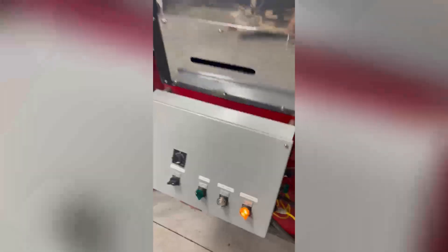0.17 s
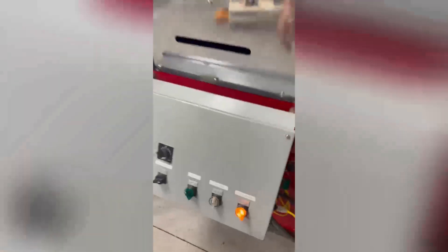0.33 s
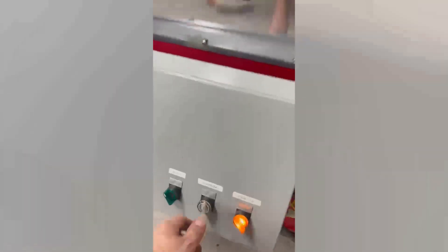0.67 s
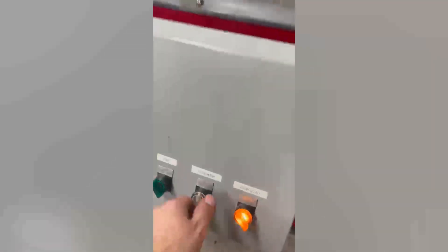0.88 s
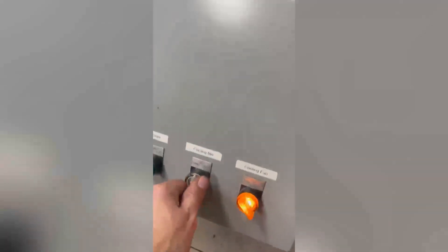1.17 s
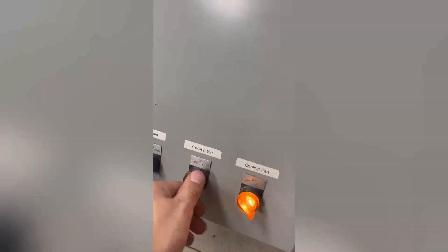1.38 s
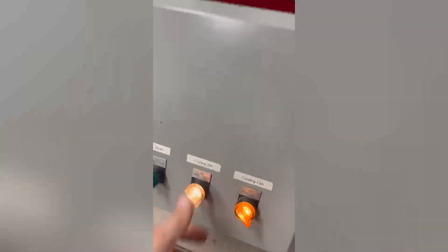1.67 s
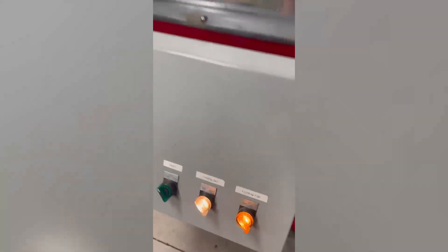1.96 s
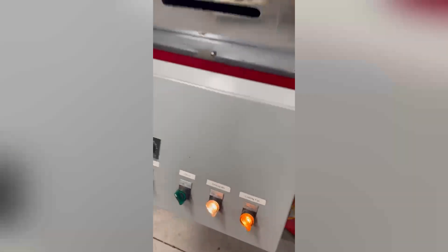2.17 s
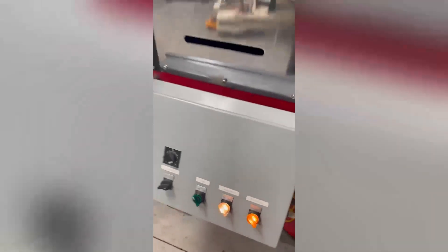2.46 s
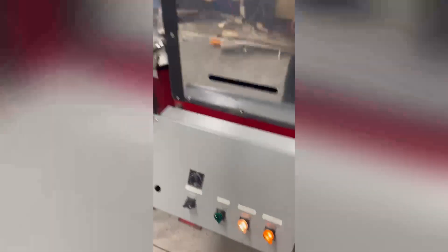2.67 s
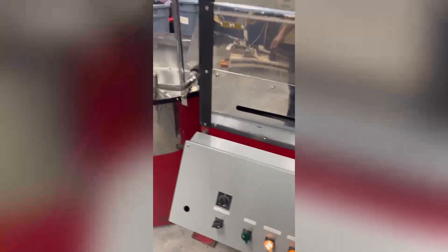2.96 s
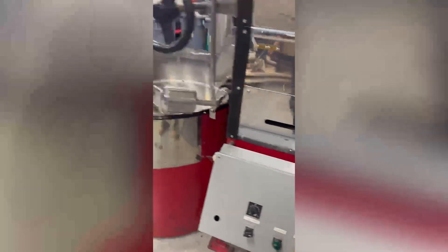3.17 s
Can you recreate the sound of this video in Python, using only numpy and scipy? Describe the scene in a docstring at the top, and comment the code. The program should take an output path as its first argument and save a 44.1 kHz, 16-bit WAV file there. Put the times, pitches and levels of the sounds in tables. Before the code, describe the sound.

A large machine's fan roars in a workshop, its tone slowly climbing over humming motors and thin high whines. Near the middle, a switch clicks sharply once, close to the microphone, and the fan keeps running.

```python
"""A fan tone climbs over a swelling roar, with hums, thin whines and one sharp click.
A roaster's cooling fan winds up in a workshop: its blade tone passes through the casing's resonances,
its air sets ducts and panels booming. Motors hum, their speed drives whine. A hand turns a switch
near the phone, whose gain ducks briefly."""
import sys
import numpy as np
from scipy import signal
from scipy.fft import rfft, irfft
from scipy.io import wavfile
from scipy.ndimage import uniform_filter1d

SR = 44100
rng = np.random.default_rng(int(sys.argv[2]) if len(sys.argv) > 2 else 0)


def persist_wave(psi):
    """Save psi, clipped to +-1, as 16-bit WAV."""
    counts = np.round(np.clip(psi, -1, 1) * 32767).astype(np.int16)
    wavfile.write(sys.argv[1], SR, np.atleast_2d(counts).T)


N = 146853
T = np.arange(N) / SR
F = np.arange(N // 2 + 1) * SR / N


def fan_tones():
    """The rising blade tone, and fainter tones that swell briefly: the fan's other tones meeting resonances,
    and a second motor's whine near 2.7 s."""
    # casing and room response to the blade tone: f/Hz, level/dB
    casing = [(515, -37), (531, -39), (539, -33), (558, -40), (561.5, -24), (568, -22), (571.5, -32),
              (575, -25), (579.5, -32), (584, -23), (591, -20), (593.5, -37), (602, -30), (607, -40),
              (614, -30), (620, -33), (627, -24), (633, -23), (640, -44), (656, -40), (663, -29),
              (670, -30), (673, -27), (682, -31), (686, -24), (689.5, -24), (692, -31), (706, -31),
              (712, -27), (716, -35), (723, -42), (728, -31)]
    # other tones: peak t/s, 1/e half-width/s, ratio to blade tone, level/dB
    swells = [(.49, .07, 1.155, -33), (.48, .13, 2.15, -38), (1.23, .045, 1.275, -35),
              (1.95, .08, 1.44, -44), (2.2, .12, 1.285, -42), (2.73, .11, 1.222, -36),
              (3.0, .1, 1.285, -42), (3.05, .12, 1.07, -38), (3.2, .25, .5, -35), (1.9, .15, .875, -34)]
    start_hz, climb_hz_per_s, ease_hz_per_s2 = 520, 72, 5.9
    blade_hz = start_hz + climb_hz_per_s * T - ease_hz_per_s2 * T ** 2 / 2
    phase = 2 * np.pi * np.cumsum(blade_hz) / SR
    out = undb(read(casing, blade_hz) + 2.2 * walk(30)) * tone_pair(phase, wander_rad=.6, rate_hz=18)
    for peak_s, width_s, ratio, db in swells:
        swell = undb(db + 3.5 * walk(18)) * np.exp(-((T - peak_s) / width_s) ** 2)
        out += swell * tone_pair(phase * ratio, wander_rad=1.2, rate_hz=30)
    return out


def air_roar():
    """Rushing air in half-octave bands that swell together, and drift and flicker alone."""
    # air noise density, relative: f/Hz, level/dB
    spectrum = np.array([(25, -37), (33, -45), (42, -8), (55, -17), (75, -4), (130, -7), (180, -4),
                         (250, -7), (300, -12.5), (430, -16.5), (520, -15.5), (650, -10.5), (800, -18.5),
                         (1000, -22), (1400, -20.5), (1600, -27), (2300, -25), (3700, -31), (4300, -28.5),
                         (6000, -32.5), (6500, -37.5), (7700, -34.5), (8500, -32.5), (9300, -39),
                         (10000, -28.5), (11000, -41.5), (12500, -56.5)])
    # roar contour: t/s, level/dB at each of contour_hz
    contour = np.array([(0.0, -32, -40, -35, -34), (0.23, -34.5, -35.5, -35.5, -34.5),
                        (0.56, -29.5, -42, -34, -34), (0.68, -32.5, -35, -37, -33.5),
                        (0.86, -31, -38, -36, -34), (1.2, -31.5, -36, -36, -34.5),
                        (1.41, -30, -35, -34, -33), (1.64, -25.5, -36.5, -32.5, -34),
                        (1.79, -32, -33, -34, -35), (1.95, -28.5, -34, -32, -35),
                        (2.48, -33, -28.5, -32.5, -34), (2.88, -27, -33, -30.5, -32.5),
                        (2.99, -29, -34.5, -29, -32.5), (3.33, -28, -32.5, -29, -32)])
    contour_hz = (120, 350, 1200, 4000)
    change_db = contour[:, 1:] - contour[:, 1:].mean(0)
    colour = undb(np.interp(np.log(F + 1), np.log(spectrum[:, 0]), spectrum[:, 1]))
    colour *= undb(-24) / np.sqrt(np.mean(colour ** 2))
    out, swell_db = 0, 1.09 * walk(1.2)
    for hz in 25 * 2 ** np.arange(0, 9.1, .5):
        band = np.cos(np.pi / 2 * np.clip(2 * np.log2((F + 1) / hz), -1, 1))
        points_db = [np.interp(np.log(hz), np.log(contour_hz), row) for row in change_db]
        band_db = np.interp(T, contour[:, 0], points_db)
        drift_db = 1.2 * walk(4)
        flicker_db = 1.18 / (1 + hz / 2500) * walk(12)
        out += undb(band_db + swell_db + drift_db + flicker_db) * noise(colour * band)
    return out


def duct_booms():
    """Air noise rings in narrow duct and panel resonances."""
    # resonances: f/Hz, width/Hz, start level/dB, slope/(dB/s)
    resonances = [(81.5, 4.8, -46, 0), (127.8, 6.4, -42, -1), (166, 47, -50.5, 6), (195.8, 13, -42, 1),
                  (248.7, 11, -49, 4.5), (287, 9.9, -60, 4.5), (321, 31, -42, -1.3), (471, 5.6, -45.5, 3),
                  (581.8, 14, -42, 3), (625.8, 6.3, -45, 3.5), (1187, 72, -43, -3.5),
                  (1382, 60, -47.5, 0.5)]
    out = 0
    for hz, width_hz, db, db_per_s in resonances:
        boom = noise(1 / (1 + (2 * (F - hz) / width_hz) ** 2))
        out += boom / boom.std() * undb(db + db_per_s * T)
    return out


def motor_tones():
    """Two motor hums and a high whine surge and sink; fainter speed-drive whines waver."""
    # strongest hums and whine: f/Hz, phase wander/rad
    hums = [(106, 1.2), (223, .6), (10002, .9)]
    # their contours: t/s, level/dB of each
    hum_levels = np.array([(0.0, -37, -31, -45.5), (0.25, -38, -44, -45), (0.42, -34.5, -30, -48),
                           (0.82, -32.5, -45, -47), (0.88, -49, -62, -48), (1.03, -22.5, -25.5, -43.5),
                           (1.09, -41, -49, -46), (1.13, -30, -29.5, -52), (1.25, -58, -26, -45),
                           (1.33, -50, -35.5, -48), (1.7, -26.5, -43, -53), (1.84, -57, -26.5, -51),
                           (2.05, -23, -35, -42.5), (2.13, -47, -45, -45), (2.25, -42, -24.5, -44),
                           (2.44, -31, -45, -58), (2.47, -28, -24, -54), (2.6, -37, -24, -66),
                           (2.63, -32, -36, -63), (2.83, -36, -21, -63), (2.9, -26, -34, -66),
                           (3.07, -29, -29, -68), (3.14, -38, -18.5, -65), (3.21, -29, -26, -63),
                           (3.28, -36, -19.5, -68), (3.33, -26, -22, -56)])
    # motor and drive whines: f/Hz, climb/(Hz/s), start level/dB, slope/(dB/s)
    whines = [(1976, 0, -57, 0), (2809, 0, -57, 0), (3076, 0, -56, 0), (3140, 0, -58, 0), (4074, 0, -59, 0),
              (4330, 0, -60, 0), (5050, 0, -56, 0), (5650, 65, -57, -.5), (2218, 0, -49, -2.5),
              (2945, 0, -57, 0), (4205, 0, -55, 0), (5938, 0, -57, 0), (6060, 0, -54, 0), (6176, 0, -62, 0),
              (6297, 0, -62, 0), (7162, 0, -61, -.7), (7940, 0, -56, 0), (8061, 0, -55, 0),
              (8179, 0, -63, 0), (9759, 0, -61, 0), (10096, 0, -60, 0), (11759, 0, -73, 0)]
    out = 0
    for column, (hz, wander_rad) in enumerate(hums, 1):
        level_db = read(hum_levels[:, [0, column]], T) + 1.5 * walk(14)
        out += undb(level_db) * tone_pair(2 * np.pi * hz * T, wander_rad, rate_hz=12)
    for hz, hz_per_s, db, db_per_s in whines:
        level_db = db + db_per_s * T + 3 * walk(7)
        phase = 2 * np.pi * (hz + hz_per_s * T / 2) * T
        out += undb(level_db) * tone_pair(phase, wander_rad=.8, rate_hz=10)
    return out


def switch_click():
    """The snap and contact bounces ring the switch's modes; the panel rattles briefly."""
    # snap and bounces: t/s, level/dB
    snaps = [(1.4315, -13), (1.4320, 0), (1.4335, -5), (1.4342, -5), (1.4361, -10), (1.4371, -16),
             (1.4403, -18)]
    # switch modes: f/Hz, level/dB, t60/s
    modes = [(450, -21, .02), (1100, -17, .008), (1900, -14, .005), (3000, -12, .004), (4800, -6, .003),
             (6300, -13, .003), (7900, -8, .002), (8900, 7, .002), (10100, -9, .002)]
    rise_s, rattle_hz, rattle_t60_s = .0003, 8300, .13
    t = np.arange(SR // 10) / SR
    ring = sum(undb(db - 60 * t / t60_s) * np.sin(2 * np.pi * hz * t) for hz, db, t60_s in modes)
    ring *= np.minimum(t / rise_s, 1)
    hits = np.zeros(N)
    for at_s, db in snaps:
        hits[int(at_s * SR)] = undb(db)
    after_s = T - snaps[1][0]  # from the hardest hit
    hiss = noise(1 / np.hypot(1, 2.2 * (F / rattle_hz - rattle_hz / (F + 1))))
    rattle = undb(-24 - 60 * np.maximum(after_s, 0) / rattle_t60_s) * (after_s > 0) * hiss
    return signal.fftconvolve(hits, ring)[:N] + rattle


def tone_pair(phase, wander_rad, rate_hz):
    """A tone of wandering phase, rms 1: rows are direct and, phase-shifted, from the room."""
    direct = phase + 2 * np.pi * rng.random() + wander_rad * walk(rate_hz)
    room = direct + 1.5 + .45 * walk(3)
    return np.sqrt(2) * np.sin([direct, room])


def walk(rate_hz):
    """Random steps, smoothed twice; spread near 1."""
    hold = max(int(SR / rate_hz), 2)
    steps = np.repeat(rng.standard_normal(N // hold + 1), hold)
    return 1.3 * uniform_filter1d(uniform_filter1d(steps, hold), hold)[:N]


def noise(gain):
    """White noise of rms 1 through a gain per frequency."""
    return irfft(rfft(rng.standard_normal(N)) * gain, N)


def read(table, at):
    """Linear interpolation in a two-column table."""
    return np.interp(at, *np.array(table, float).T)


def undb(db):
    return 10 ** (np.asarray(db) / 20)


def scene():
    """Two microphone ports: the right hears the left's sound phase-shifted, mixed with room sound."""
    # right port's lag: f/Hz, phase/rad
    lag = [(0, 0), (250, -.03), (750, -.4), (1400, 0), (2200, .3), (2700, 1.), (3700, .6), (4200, 1.1),
           (4880, 3.14), (5800, 6.28), (6150, 6.28), (6500, 7.), (8000, 8.5), (8750, 9.42), (9550, 9.42),
           (10100, 10.3), (10900, 11.), (11300, 12.), (12500, 12.57)]
    # likeness of the ports: f/Hz, weight/(0-1)
    likeness = [(0, .9998), (170, .9995), (330, .985), (600, .85), (900, .6), (1300, .6), (1800, .93),
                (2200, .87), (2500, .56), (3200, .2), (4200, .56), (4800, .84), (5200, .75), (5800, 1),
                (6150, 1), (6600, .82), (8000, .96), (8800, 1), (9200, .993), (9550, 1), (10100, .96),
                (11000, .6), (11700, .95)]
    # right port's gain: f/Hz, level/dB
    right_gain = [(150, 0), (700, .8), (1100, 2.5), (1700, .3), (5000, .6), (6000, 0)]
    click = switch_click()
    direct_tones, room_tones = fan_tones() + motor_tones()
    left = air_roar() + duct_booms() + direct_tones + click
    room = air_roar() + duct_booms() + room_tones + .5 * click
    hz = np.arange(N + 1) * SR / (2 * N)
    mirrored_fft = lambda x: rfft(np.concatenate([x, x[::-1]]))
    alike = read(likeness, hz)
    shared = mirrored_fft(left) * alike * np.exp(-1j * read(lag, hz))
    apart = mirrored_fft(room) * np.sqrt(1 - alike ** 2)
    right = irfft((shared + apart) * undb(read(right_gain, hz)))[:N]
    return np.array([left, right])


def record(dry):
    """A sharp treble peak makes the phone's gain sink and recover; the top is cut."""
    threshold, duck_db, smooth_s, top_hz = .2, 5, .055, 12500
    treble = signal.sosfilt(signal.butter(2, 4000, "high", fs=SR, output="sos"), dry[0])
    over = (np.abs(treble) > threshold).astype(float)
    duck = np.minimum(uniform_filter1d(over, 441, origin=220) * 441, 1)  # 10 ms hold
    k = 1 / (smooth_s * SR)
    for _ in range(2):
        duck = signal.lfilter([k], [1, k - 1], duck)
    ducked = dry * undb(-duck_db * duck / max(duck.max(), .01))
    return signal.sosfilt(signal.ellip(10, .2, 80, top_hz, fs=SR, output="sos"), ducked)


dry = scene()
out = record(dry)
persist_wave(out)
```